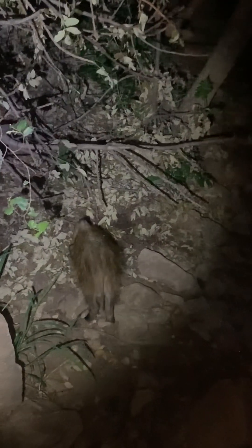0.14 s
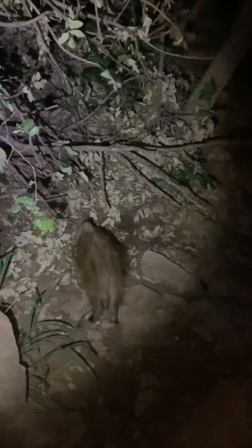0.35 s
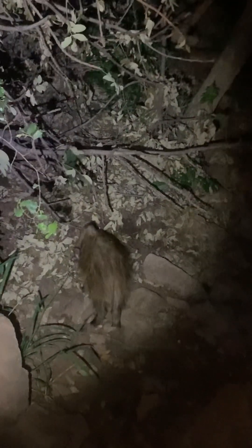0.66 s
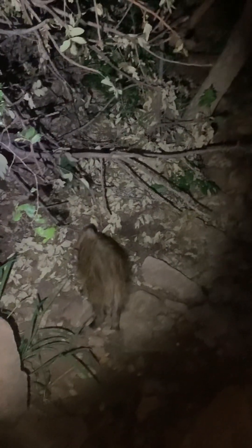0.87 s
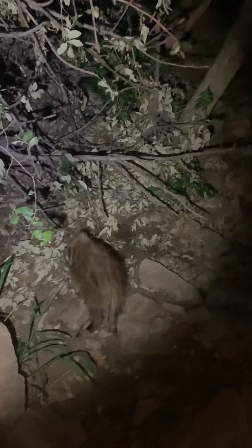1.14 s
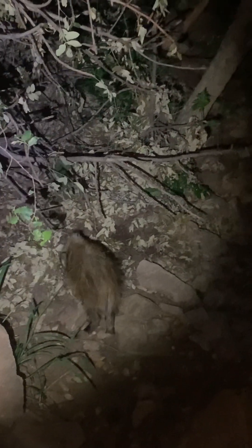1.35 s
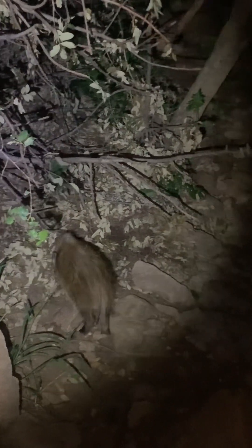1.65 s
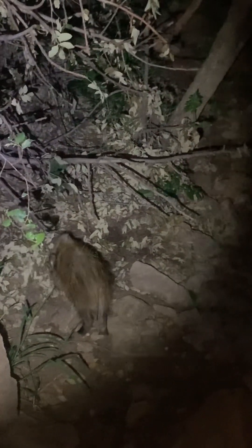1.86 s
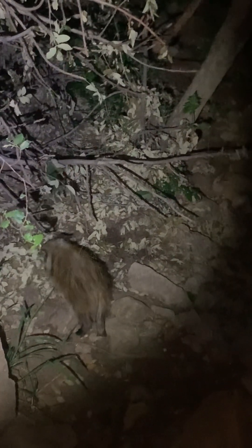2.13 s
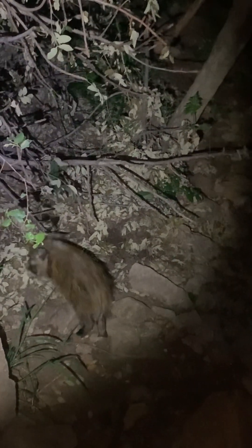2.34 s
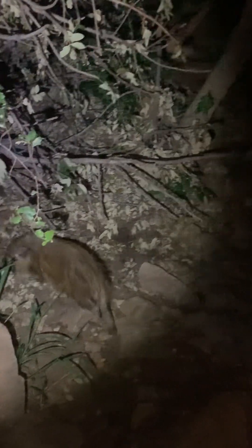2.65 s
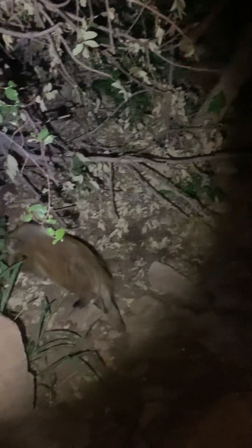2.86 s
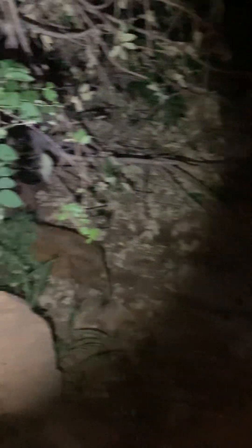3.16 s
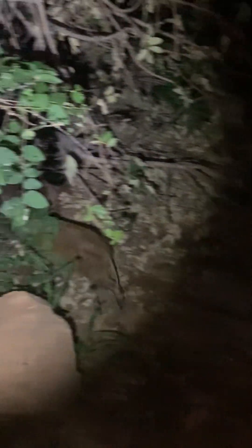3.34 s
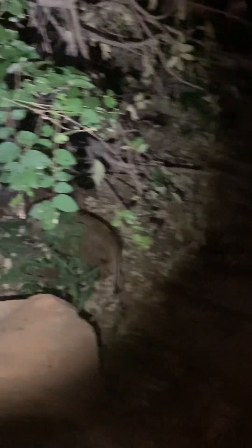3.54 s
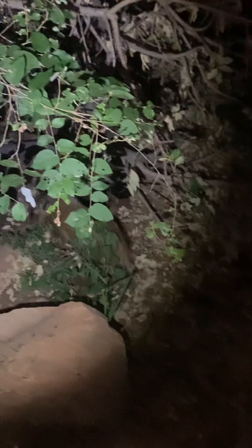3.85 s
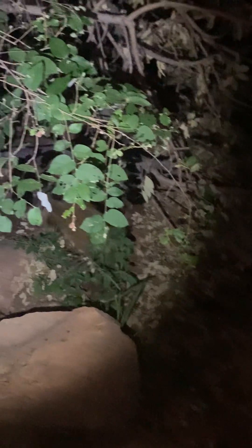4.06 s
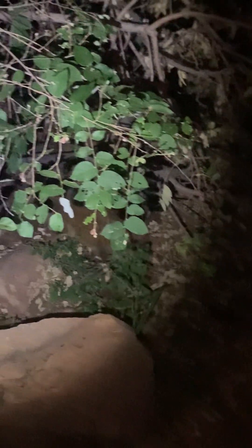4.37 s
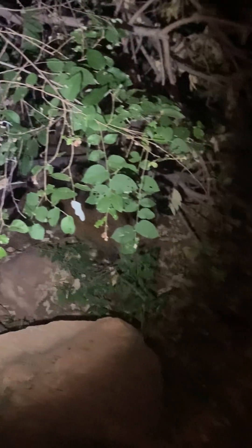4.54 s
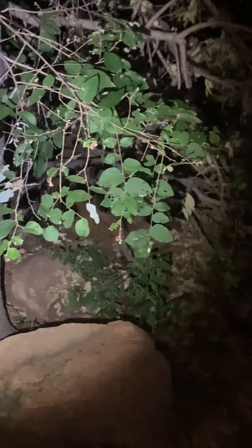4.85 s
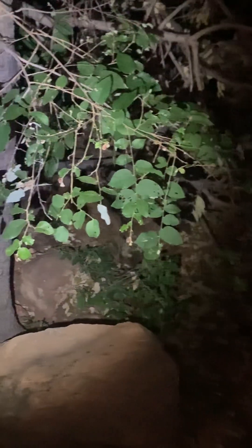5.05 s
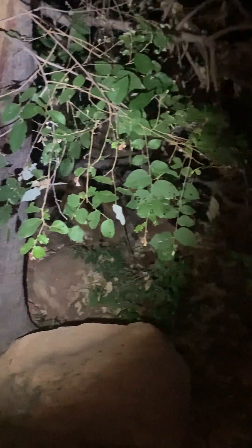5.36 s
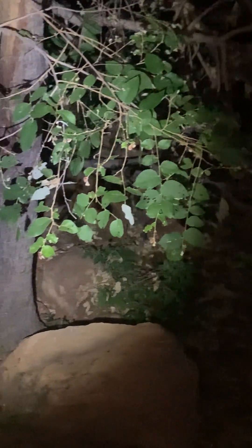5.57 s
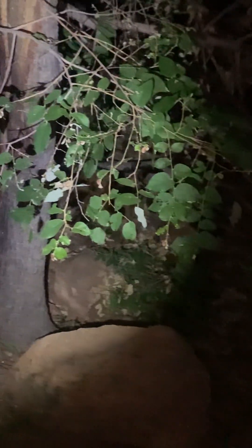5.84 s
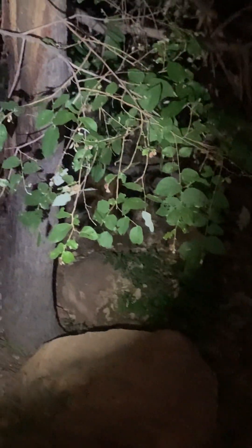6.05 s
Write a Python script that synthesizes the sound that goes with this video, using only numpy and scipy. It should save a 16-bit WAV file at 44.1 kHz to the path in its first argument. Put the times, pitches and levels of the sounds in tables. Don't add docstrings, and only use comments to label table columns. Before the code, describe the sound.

A small animal rustles through dry leaf litter at night, faint crickets whistling and handling rumble below, then a close katydid rasps and two dull knocks land.

```python
import sys
import numpy as np
from scipy import signal
from scipy.fft import rfft, irfft, next_fast_len
from scipy.io import wavfile
from scipy.ndimage import uniform_filter1d

SR = 44100
rng = np.random.default_rng(int(sys.argv[2]) if len(sys.argv) > 2 else 0)


def to_wav(s):
    ch = np.atleast_2d(s).T
    pcm = np.round(np.clip(ch, -1, 1) * 32767)
    wavfile.write(sys.argv[1], SR, pcm.astype(np.int16))


def boost_factor(decibels):
    exponent = np.asarray(decibels, float) / 20
    return 10 ** exponent


N = 273552
LONG = next_fast_len(N)
BINS_HZ = np.fft.rfftfreq(LONG, 1 / SR)
COARSE_S = np.arange(0, N, 32) / SR


def curves(table):
    s, *columns = np.transpose(table)
    return [np.interp(np.arange(N) / SR, s, c) for c in columns]


def fine(x):
    return np.interp(np.arange(N) / SR, COARSE_S, x)


def back_in_time(spectrum):
    return irfft(spectrum, LONG)[..., :N]


def coloured(x, colour):
    hz, db = np.transpose(colour)
    gain_db = np.interp(np.log(BINS_HZ + 1), np.log(hz), db, left=-90, right=-90)
    y = back_in_time(rfft(x, LONG) * boost_factor(gain_db))
    return y / np.sqrt(np.mean(y ** 2))


def walk(rate):
    k = int(SR / rate)
    return uniform_filter1d(np.repeat(rng.standard_normal(N // k + 1), k), k)[:N]


def ring(x, hz, t60):
    pole = np.exp(2j * np.pi * hz / SR - np.log(1000) / (t60 * SR))
    return signal.lfilter([1], [1, -pole], x).imag


def add(out, s, x):
    i = int(s * SR)
    out[..., i:i + x.shape[-1]] += x[..., :out.shape[-1] - i]


def pair(apart, size, grain_db):
    same, other = rng.standard_normal((2, N))
    grain_levels = np.minimum(rng.exponential(size=N // size + 1), 6)
    grains = boost_factor(grain_db * np.repeat(grain_levels, size)[:N])
    return grains * (same + apart * other * np.array([[1], [-1]]))


def swells(s, db, swell, fade):
    since = COARSE_S - np.reshape(s, (-1, 1))
    rise = np.reshape(np.abs(swell), (-1, 1))
    fall = np.reshape(np.abs(fade), (-1, 1))
    span = np.where(since < 0, -rise, fall)
    return boost_factor(2 * (np.reshape(db, (-1, 1)) - 10 * (since / span)))


def within(spans, t, edge):
    return sum(np.tanh((t - a) / edge) - np.tanh((t - b) / edge) for a, b in spans) / 2


# (frequency [Hz], phase [rad])
PHASE_SPREAD = [(200, 3.7), (800, 10.13), (2400, 14.86), (2900, 13.88), (4700, 15.64), (5250, 16.42),
                (7000, 18.98), (9780, 21.99), (12250, 25.13), (14700, 28.2)]


def spread(x):
    half = np.interp(BINS_HZ, *np.transpose(PHASE_SPREAD)) / 2
    return back_in_time(rfft(x, LONG) * np.exp(1j * np.array([half, -half])))


# (time [s], peak level [dB], swell [s per 10 dB], fade [s per 10 dB], low rustle re peak [dB])
SHUFFLES = [(.04, -59.5, -2, -0.0452, -2.5), (0.31, -61, 0.1133, 0.0275, -4.5),
            (0.529, -61, 0.2, 0.0868, -4.5), (.62, -69, -1.22, 0.1853, -9),
            (1.029, -64, 0.1025, 0.18, -2.5), (1.43, -61.5, 0.2764, 0.1477, -3),
            (1.849, -61, 0.22, 0.1274, -3.5), (2.19, -67, .5, 0.39, -3), (2.517, -51, 0.0914, 0.0786, -7.5),
            (2.7, -65.5, -0.5, 0.61, -7.5), (3.17, -61, 0.4138, 0.12, -6),
            (3.52, -64.5, 0.2762, 0.2, -15.5), (3.867, -59, 0.2145, 0.0686, -4),
            (4.089, -60, 0.1784, 0.14, -5.5), (4.35, -72, 0.06, .5, -6.5), (4.581, -65, -0.93, 0.2161, -3),
            (4.872, -59.5, -0.027, 0, -6.5), (5.079, -66, 0.1955, 0.22, -8),
            (5.25, -66.5, 0.14, 0.47, -4.5), (5.7, -67, 0.45, 0.245, -1), (5.99, -70, 2.5, 6.4, -20),
            (6.21, -71, 0.16, .1, -6.5)]
# (time [s], peak level [dB], low rustle re peak [dB])
TREADS = [(.01, -54.5, -4), (0.099, -62.5, -1), (1.19, -66, 0), (2.364, -59, -1.5), (2.845, -55, -2),
          (2.919, -58.5, -4.5), (4.209, -64.5, -3.5), (5.4, -56, -11), (5.956, -62, -7)]
# (time [s], level [dB])
NIGHT_HISS = [(0, -71), (3.9, -69.5), (4.3, -75), (4.62, -75), (4.8, -60), (5.2, -65.5), (5.75, -58),
              (5.95, -60), (6.15, -59.5)]
# (frequency [Hz], level [dB])
LITTER_COLOUR = [(1500, -28), (2300, -8.5), (3200, -1), (5000, -1.5), (7500, 0.5), (9000, -6),
                 (11000, -21.5), (14000, -28)]
LOW_RUSTLE_COLOUR = [(600, -62), (850, -9.5), (1200, -4), (1700, -1.5), (2200, -4), (3000, -12)]
HISS_COLOUR = [(6000, -24.5), (9000, -3.5), (11000, 2.5), (12800, 2), (13800, -6), (15000, -14),
               (15700, -20.5)]


def litter():
    tread_swell_s, tread_fade_s = 0.00417, 0.0348
    still_db, still_low_db, hiss_re_leaves_db = -83.5, -100, -7
    treads = [(s, db, tread_swell_s, tread_fade_s, low) for s, db, low in TREADS]
    s, db, swell, fade, low_db = np.transpose(SHUFFLES + treads)
    moves = swells(s, db, swell, fade)
    leaves = fine(moves.sum(axis=0)) + boost_factor(2 * still_db)
    low = fine(boost_factor(2 * low_db) @ moves) + boost_factor(2 * still_low_db)
    hiss = boost_factor(2 * hiss_re_leaves_db) * leaves + boost_factor(2 * curves(NIGHT_HISS)[0])
    # power, colour, gain [dB], grain depth [dB], share that differs between channels
    layers = [(leaves, LITTER_COLOUR, 6.5, 1.8, .45),
              (low, LOW_RUSTLE_COLOUR, 1.1, 1.8, .45),
              (hiss, HISS_COLOUR, 6, 1.2, .2)]
    out = np.zeros((2, N))
    for power, colour, gain_db, grain_db, apart in layers:
        noise = coloured(pair(apart, size=24, grain_db=grain_db), colour)
        out += noise * np.sqrt(power) * boost_factor(gain_db + 2.244 * walk(30))
    return out


def patchy(x):
    z = signal.stft(x, nperseg=1024)[2]
    field = rng.standard_normal(z.shape[1:])
    field = uniform_filter1d(field, size=5, axis=0)
    field = uniform_filter1d(field, size=4, axis=1)
    return signal.istft(z * boost_factor(2.5 * field / field.std() - 1.2), nperseg=1024)[1][:, :N]


# (from [Hz], to [Hz], gain [dB])
SUM_GAPS = [(2099, 2560, -2), (4181, 4630, -2.5), (4633, 5322, -8), (8936, 10301, -15), (13830, 18000, -15)]
DIFFERENCE_GAPS = [(6700, 7600, -11), (6840, 7500, -25.5), (11860, 12600, -8.5), (13500, 19000, -5)]


def thinned(x):
    def gap_gain(gaps):
        return boost_factor(sum(db * ((BINS_HZ > lo) & (BINS_HZ < hi)) for lo, hi, db in gaps))

    left, right = rfft(x, LONG)
    both = gap_gain(SUM_GAPS) * (left + right) / 2
    apart = gap_gain(DIFFERENCE_GAPS) * (left - right) / 2
    return back_in_time(np.array([both + apart, both - apart]))


# (time [s], peak level [dB], frequency [Hz], length [s per 10 dB])
CHIRPS = [(.0, -65, 3530, 0.05), (.23, -65, 3630, 0.05), (0.29, -60.5, 3640, .04), (0.36, -66, 3505, 0.05),
          (0.42, -58.5, 3535, 0.07), (0.72, -70, 3510, 0.1), (0.8, -71, 3620, 0.05), (0.89, -62, 3560, .07),
          (1.162, -67, 3510, 0.05), (1.3, -65, 3590, .08), (1.42, -70, 3550, 0.08),
          (1.574, -65, 3449, 0.05), (1.72, -69, 3570, 0.05), (1.808, -67, 3553, 0.04),
          (2.03, -64, 3460, 0.07), (2.146, -69, 3450, 0.06), (2.44, -68, 3480, 0.08),
          (2.544, -67, 3440, .05), (2.885, -65, 3450, .05), (2.945, -60, 3450, 0.04),
          (3.328, -63, 3475, 0.06), (4.318, -66.5, 3655, .05), (4.44, -70, 3450, 0.07),
          (4.748, -67, 3530, 0.08), (4.9, -69, 3443, 0.06), (5.06, -68.5, 3620, .05),
          (5.13, -72, 3620, .05), (5.21, -66, 3585, 0.05), (5.286, -61, 3535, 0.06), (5.38, -69, 3440, .05),
          (5.659, -64, 3604, 0.07), (5.78, -68, 3540, .09), (5.9, -73, 3430, 0.06), (6.08, -65, 3605, 0.06),
          (6.177, -67, 3550, 0.05)]


def crickets():
    fade_share, sag_hz_per_s = 1.2, 200
    out, t = np.zeros(N + SR), np.arange(-SR // 4, SR // 4) / SR
    for (s, db, hz, length), start in zip(CHIRPS, rng.random(len(CHIRPS))):
        span = length * np.where(t < 0, 1, fade_share)
        turns = hz * t - sag_hz_per_s * t ** 2 / 2 + start
        add(out, s, boost_factor(db - 10 * (t / span) ** 2) * np.cos(2 * np.pi * turns))
    out = signal.hilbert(out[SR // 4:SR // 4 + N], LONG)[:N]
    wander = np.cumsum(12 * walk(40)) / SR
    tone = (out * np.exp(2j * np.pi * wander)).real
    pulse = np.sin(2 * np.pi * np.cumsum(33 + 3 * walk(5.0)) / SR)
    return tone * boost_factor(5.5 + 2.25 * walk(55) + 3.58 * pulse)


def drifting(colour, turn):
    half = curves(turn)[0] / 2
    noise = signal.hilbert(coloured(rng.standard_normal(N), colour), LONG)[:N]
    noise = noise / uniform_filter1d(np.abs(noise), size=SR // 20) ** 0.235
    return (noise * np.exp(1j * np.array([half, -half]))).real


# (time [s], peak level [dB], swell [s per 10 dB], fade [s per 10 dB])
SURGES = [(.29, -56.5, 5.5, -0.3), (.52, -50.5, 0.0858, 0.1545), (.76, -56, 0.5, -0.1), (.87, -57, 0.13, 0),
          (.96, -51, 0.08, -0.007), (1.16, -53.5, 0.0553, .5), (1.65, -63, 3.5, 0), (1.85, -61, 0.55, -0.6),
          (1.95, -58, 0.12, -0.56), (2.14, -53.5, 0.33, 0.04), (2.23, -57.5, -0.24, -0.02),
          (2.311, -55, -0.26, 0.49), (2.54, -52, 0.07, -0.34), (2.68, -62.5, 0.46, -0.5),
          (2.88, -61.5, 0, -0.18), (2.97, -55, -0.63, 0.3), (3.1, -63, 0, 1), (3.45, -56, -0.72, 0.24),
          (4.1, -59.5, 1.15, 0), (4.351, -55.5, 0.72, 0.5), (5.04, -53.5, 0.5946, -2.28),
          (5.53, -61.5, 0.5, 2), (5.84, -51, -0.02, 0.5), (6.08, -51.5, -0.03, 0.53),
          (6.2, -59.5, 0.12, -5.5)]
# (time [s], peak level [dB], swell [s per 10 dB], fade [s per 10 dB])
FINGERS = [(.3, -73, 1, 1), (.52, -69, 0.5, 0.27), (1.16, -72.5, 0.32, .5), (1.69, -70, 0.16, 0.05),
           (1.878, -72.5, 0.21, 0.31), (2.16, -69.5, 0.07, 0.16), (2.499, -65.5, 0.1058, 0.1636),
           (2.72, -69, -0.0045, 0.18), (3.02, -72, -0.8, 1), (4.21, -73.5, 0.5, 0.03),
           (4.78, -74.5, 0.8, 0.84), (5.42, -68, 0.1648, 0.11), (5.9, -64.5, 0.17, 0.12),
           (6.08, -71, -0.01, -3.5)]
# (time [s], phase [rad])
RUMBLE_TURN = [(0, -2), (.5, 1), (1.75, -2), (2.0, 0.5), (2.25, 1), (2.75, 1.25), (3.6, 2), (4.3, 1.61),
               (5.0, -0.5), (5.25, 1), (5.5, -2), (6.0, -2.5)]
THROB_TURN = [(0, 4), (.5, 0.5), (.8, 1.5), (1.6, -0.5), (2.2, 3), (2.7, 2), (3.5, 2.5), (3.8, 0.5),
              (4, -0.5), (4.3, -1), (5.2, -0.5), (5.4, -1.5), (6.2, -2)]
# (time [s], level [dB])
THROB_LEVEL = [(0, -0.5), (2.5, -0.5), (2.7, -7), (3.5, -4.5), (3.7, 1.5), (4.9, 0), (5.1, -9.5), (6.2, -7)]
# (frequency [Hz], level [dB])
RUMBLE_COLOUR = [(15, -35), (30, -7), (55, 1), (85, -9), (110, -21), (150, -59.5)]
THROB_COLOUR = [(60, -40), (90, 0.5), (110, 4.5), (140, -8.5), (200, -17.5), (300, -46.5)]
MURMUR_COLOUR = [(100, -6.5), (200, -4), (400, -0.5), (600, 1.5), (720, -10), (850, -24.5), (1100, -8.5)]
# (from [s], to [s])
MUTES = [
    (-.1, 0.2013),
    (5.095, 5.4),
    (5.975, 6.06),
]


def rumble():
    calm_rumble_db, calm_murmur_db = -67.5, -84.5
    mute_rumble_db, mute_murmur_db = -21.5, -5.5
    t = np.arange(N) / SR
    throb = boost_factor(-11.5 + curves(THROB_LEVEL)[0]) * drifting(THROB_COLOUR, THROB_TURN)
    deep = drifting(RUMBLE_COLOUR, RUMBLE_TURN) + throb
    deep *= fine(np.sqrt(swells(*np.transpose(SURGES)).sum(axis=0) + boost_factor(2 * calm_rumble_db)))
    murmur = spread(coloured(pair(0.733, size=200, grain_db=1.5), MURMUR_COLOUR))
    murmur *= fine(np.sqrt(swells(*np.transpose(FINGERS)).sum(axis=0) + boost_factor(2 * calm_murmur_db)))
    muted = within(MUTES, t, edge=0.0105)
    deep *= boost_factor(mute_rumble_db * muted + 2.0)
    murmur *= boost_factor(mute_murmur_db * muted + 2.0 + 2.93 * walk(21.94))
    duck_db = sum(-18 * np.exp(-((t - s - length - .02) / 0.0096) ** 4) for s, _, _, length, *_ in KNOCKS)
    return boost_factor(duck_db) * (deep + murmur)


# (time [s], peak level [dB], centre [Hz], width [share of centre])
SNAPS = [(0.0185, -37, 6110, 0.55), (0.0931, -40.5, 6840, 0.293), (0.658, -45, 9000, 0.93),
         (0.66, -57.5, 13000, .1), (1.7802, -46, 6760, 0.285), (2.356, -40, 6870, 0.46),
         (2.449, -41.5, 6950, 0.43), (2.496, -38.5, 7830, 0.304), (2.5211, -37, 6900, 0.27),
         (2.524, -38, 7200, 0.28), (2.5566, -31, 7520, 0.514), (2.6795, -49, 6500, 1.7),
         (2.8414, -39, 4510, 2.27), (2.853, -34, 7000, 0.823), (2.9796, -40, 7330, 0.35),
         (2.9957, -38.5, 6370, 0.525), (3.1681, -40, 7580, 0.38), (3.5126, -47, 5000, 1.18),
         (4.2063, -41.5, 6360, 0.49), (5.4145, -42, 3670, 0.39), (5.488, -43.5, 7680, 4.3),
         (5.953, -37, 6280, 0.33)]


def snaps():
    out, t = np.zeros(N), np.arange(SR // 40) / SR
    for s, db, hz, width in SNAPS:
        decay = np.exp(-t / 0.00108) + 0.266 * np.exp(-t / 0.0159)
        edges = np.clip([hz / (1.0 + width), hz * (0.983 + width)], 200, 15500)
        band = signal.butter(3, edges, "bandpass", fs=SR, output="sos")
        burst = signal.sosfilt(band, rng.standard_normal(len(t)) * decay)
        add(out, s, boost_factor(db + 3.0) * burst / np.abs(burst).max())
    return out


# (time [s], peak level [dB], frequency [Hz])
PEBBLES = [(0.0185, -51.5, 1700), (0.2523, -52.5, 3100), (0.5072, -55.5, 1440), (1.1927, -47, 1950),
           (1.3593, -54.5, 1424), (1.8342, -48, 2970), (2.4505, -44.5, 1847), (2.5986, -52.5, 1677),
           (2.6793, -53.5, 1950), (2.7272, -47.5, 1903), (2.8405, -51, 1950), (2.908, -48, 1770),
           (3.5139, -53.5, 1740), (3.7803, -54.5, 1577), (3.837, -52, 1610), (3.8541, -43, 2737),
           (4.0362, -48.5, 2410), (4.2048, -45.5, 1543), (5.3994, -55.5, 1503), (5.4144, -52.5, 3030),
           (5.4317, -53, 1660), (5.4874, -50, 3084), (5.553, -56, 1464), (5.579, -53.5, 1420),
           (5.6042, -51.5, 1496), (5.656, -52.5, 1535), (5.7223, -51.5, 1860), (5.7644, -53.5, 1330),
           (5.813, -49.5, 1260), (5.9314, -46.5, 2840), (5.9424, -48.5, 2873), (5.953, -44, 3060),
           (5.94, -54, 1270), (5.96, -62, 1216)]
# (time [s], peak level [dB], frequency [Hz])
CRACKLES = [(0.2713, -53, 7580), (0.2922, -43.5, 6570), (0.4284, -50, 7140), (0.5122, -41.5, 7060),
            (1.3414, -50, 6120), (1.3593, -45.5, 6820), (1.4032, -54.5, 7200), (1.4361, -46.5, 6700),
            (1.8297, -41, 6960), (1.9709, -47, 6700), (2.0588, -44, 6790), (2.1186, -54, 6670),
            (2.4074, -44.5, 7080), (3.0858, -49.5, 6810), (3.2365, -48, 6400), (3.372, -42.5, 5970),
            (3.473, -45.5, 7240), (3.5528, -41, 6140), (3.7025, -45, 6940), (3.7643, -48, 7100),
            (4.0801, -41, 6370), (4.3256, -47.5, 6880), (4.3313, -43, 6500), (5.9873, -41.5, 6240),
            (6.1863, -43, 7620)]


def ticks(table, t60, up_db):
    out, t = np.zeros(N), np.arange(SR // 30) / SR
    shape = np.exp(-t * np.log(1000) / t60) * (1 - np.exp(-t / 0.000374))
    for s, db, hz in table:
        modes = np.sin(2 * np.pi * hz * t) + 0.45 * np.sin(2 * np.pi * 1.4 * hz * t)
        add(out, s, boost_factor(db + up_db) * shape * modes)
    return out


def pebbles_and_crackles():
    return ticks(PEBBLES, t60=0.0219, up_db=-1.32) + ticks(CRACKLES, t60=0.01205, up_db=-1.9)


# (time [s], peak level [dB], frequency [Hz], upper ring level
# [dB])
TAPS = [(0.542, -58.5, 202, -72.5), (1.007, -63, 417, -64.5), (1.654, -57.5, 389, -60),
        (2.15, -54, 483, -86.5), (2.708, -55, 524.6, -78.5), (2.848, -52, 449.4, -76.5),
        (2.995, -57, 345, -87), (3.769, -63, 506, -92.5), (3.879, -61.5, 342, -83.5),
        (5.028, -59.5, 908, -59.5), (5.393, -66.5, 424, -70), (5.897, -55.5, 261, -76),
        (5.922, -48.5, 230, -77), (5.94, -61.5, 477, -75.5), (6.071, -56.5, 627.4, -74)]


def taps():
    out, t = np.zeros(N), np.arange(SR // 40) / SR
    swell = np.exp(-((t - .007) / 0.0035) ** 2)
    for s, db, hz, high_db in TAPS:
        low = boost_factor(db) * np.sin(2 * np.pi * hz * t)
        high = boost_factor(high_db) * np.sin(2 * np.pi * 780 * t)
        add(out, s - .003, swell * (low + high))
    return out


# (from [s], to [s])
SILENT_BLOCKS = [(4.6, 4.72), (4.77, 4.92), (4.97, 5.0), (5.035, 5.065), (5.2, 5.36), (5.41, 5.5), (5.55, 5.64),
                 (5.69, 5.78), (5.83, 5.92), (6.04, 6.07), (6.11, 6.15), (6.185, 6.25)]
# (frequency [Hz], level [dB])
FLICKER_COLOUR = [(4000, -23.5), (4300, -4.5), (5500, -1), (5800, -40.5), (14400, -40.5), (14600, 5.5),
                  (15400, 3.5), (15700, -12)]


def blocked(x, lo, hi):
    busy = within(SILENT_BLOCKS, np.arange(N) / SR + .002 * walk(7.8), 0.002)
    band = back_in_time(rfft(x.mean(axis=0), LONG) * ((BINS_HZ > lo) & (BINS_HZ < hi)))
    return x - busy * band


def flicker():
    t = np.arange(N) / SR
    gate = (t > SILENT_BLOCKS[0][0]) * (1 - within(SILENT_BLOCKS, t, 0.00195))
    return boost_factor(-77 + 2 * walk(40)) * gate * coloured(rng.standard_normal(N), FLICKER_COLOUR)


# (time [s], peak level [dB])
STROKES = [(4.679, -46.5), (4.743, -45.5), (4.81, -45.5), (4.8812, -46), (4.9523, -46), (5.023, -45),
           (5.094, -44), (5.1655, -43.5), (5.236, -43.5), (5.308, -43.5), (5.38, -43), (5.452, -45),
           (5.5244, -45.5), (5.595, -47), (5.667, -46), (5.738, -45), (5.8076, -44.5), (5.8795, -43),
           (5.9499, -44.5), (6.0222, -43), (6.093, -44.5), (6.1649, -45)]
# (frequency [Hz], t60 [s], top level [dB], loudest tooth [teeth before the last],
# loss per tooth before it [dB], loss per tooth after it [dB])
WING = [(9530, 0.0051, 2, .5, 4, 1.9), (10220, 0.0028, 2.5, 1.5, 2, 3), (10630, 0.00302, -3, 3, 2, 2),
        (11606, 0.00387, 0, 2.5, 0.2, 3.6), (12020, 0.00254, -6.5, 3, 0.72, 1.8),
        (12983, 0.0033, 2.5, 4, 0.11, 3), (13450, 0.0025, -5.5, 7, -0.23, 1.9),
        (14440, 0.0027, -11, 8, 0, 0.92)]
# (delay [s], level [dB])
ECHOES = [(.0021, -16), (.0039, -12.5), (.0055, -14.5), (.0094, -10)]


def stridulation():
    back = np.arange(35)
    gaps = 0.00096 + 0.0023 * .8 ** back
    strokes = np.array(STROKES)
    stray, uneven = rng.standard_normal((2, len(strokes), len(back)))
    times = strokes[:, :1] - np.cumsum(gaps * (1 + 0.07 * stray), axis=1) + gaps.max()
    size = boost_factor(0.4024 * strokes[:, 1:] - 16.0 + 1.1 * uneven) * (1 - back / (len(back) + 2)) ** 1.323
    out, t = np.zeros(N), np.arange(SR // 250) / SR
    for k, (hz, t60, db, top, before_db, after_db) in enumerate(WING):
        teeth = np.zeros(N)
        lost_db = before_db * np.maximum(back - top, 0) + after_db * np.maximum(top - back, 0)
        np.add.at(teeth, (times * SR).astype(int), size * boost_factor(db - lost_db))
        push = ring(teeth, hz, 0.002027)
        out += (-1) ** k * ring(push, hz, t60) / 3.867
    out = signal.sosfilt(signal.butter(6, 9700, "highpass", fs=SR, output="sos"), out)
    squeak = np.sin(2 * np.pi * (10600 * t - 444000.0 * t ** 2)) * np.sin(np.pi * t / t.max())
    for s, db in STROKES:
        add(out, s - .0015, boost_factor(db + 3.0) * squeak)
    return out


def katydid():
    late = np.arange(SR // 8) / SR
    bush = rng.standard_normal(len(late)) * np.exp(-late * np.log(1000) / 0.315) * (late > .001)
    bush *= boost_factor(-7) / np.sqrt(np.sum(bush ** 2))
    bush[0] = 1
    for s, db in ECHOES:
        bush[int(s * SR)] += boost_factor(db)
    return boost_factor(-1.5) * signal.fftconvolve(stridulation(), bush)[:N]


# (time [s], level [dB], last frequency [Hz], length [s], shell level [dB], fall of pitch [s])
KNOCKS = [
    (5.032, -25.5, 55.6, 0.033, -38, 0.005),
    (5.9125, -41.5, 47, 0.038, -52, 0.005),
]


def knocks():
    first_hz = 550
    lead = 0.33 * np.array([[-1], [1]])
    out, t = np.zeros((2, N)), np.arange(SR // 8) / SR
    for s, db, last_hz, length, shell_db, fall_s in KNOCKS:
        turns = last_hz * t + (first_hz - last_hz) * fall_s * (1 - np.exp(-t / fall_s))
        shape = (1 - np.exp(-(t / 0.00418) ** 2)) * np.exp(-(t / length) ** 3)
        add(out, s, -boost_factor(db) * shape * np.sin(2 * np.pi * turns + 0.22 + lead))
        shell = np.exp(-((t - .0075) / 0.00248) ** 2) * np.sin(2 * np.pi * 600 * t + 2.56 + lead)
        add(out, s - .004, boost_factor(shell_db) * shell)
    return out


def scene():
    ground = spread(patchy(litter()) + pebbles_and_crackles())
    leaves = blocked(thinned(ground), 3880, 5550)
    airborne = spread(crickets() + snaps() + katydid())
    near = airborne + rumble() + taps() + flicker() + knocks()
    return blocked(leaves + near, 14650, SR / 2)


def band_limit(x):
    return signal.sosfilt(signal.butter(12, 15710, fs=SR, output="sos"), x)


def record(dry):
    mix = signal.sosfilt(signal.ellip(8, .2, 70, 15600, fs=SR, output="sos"), dry)
    return band_limit(mix)


dry = scene()
out = record(dry)
to_wav(out)
```